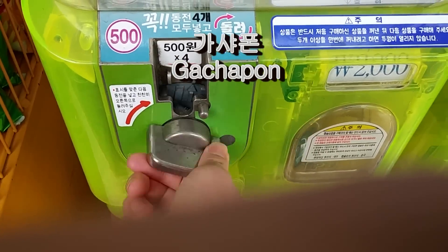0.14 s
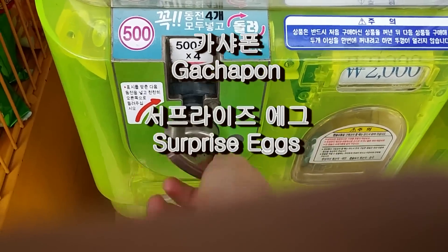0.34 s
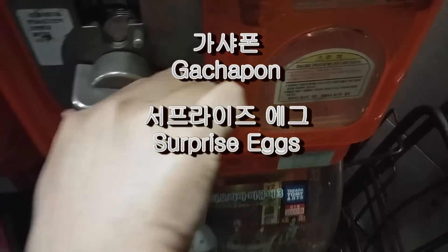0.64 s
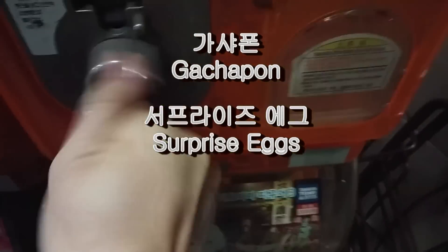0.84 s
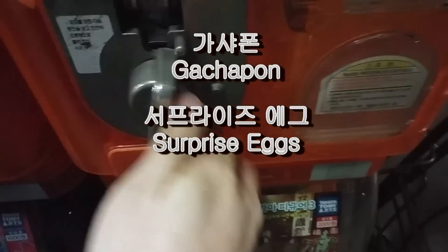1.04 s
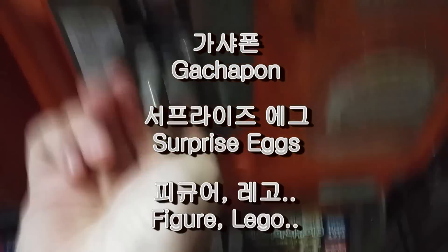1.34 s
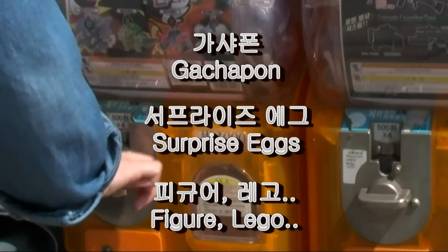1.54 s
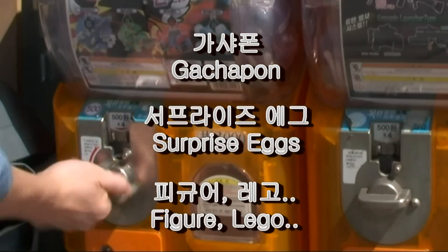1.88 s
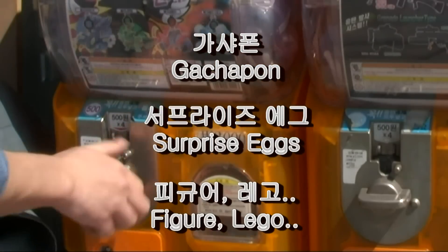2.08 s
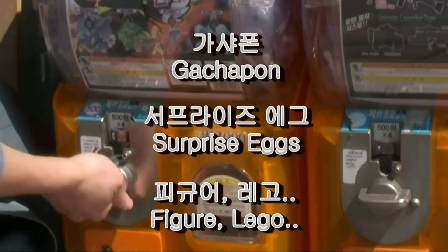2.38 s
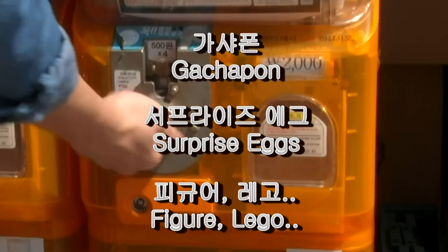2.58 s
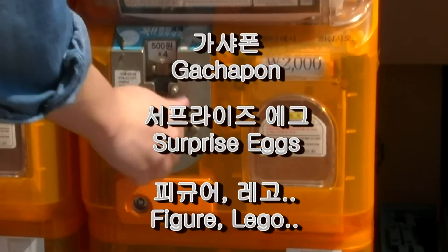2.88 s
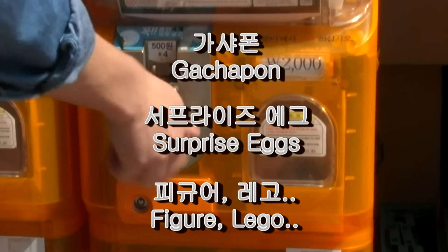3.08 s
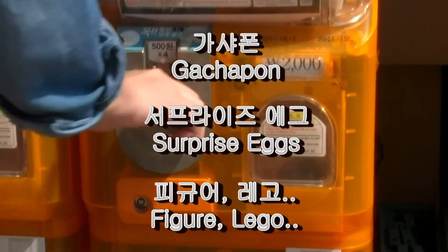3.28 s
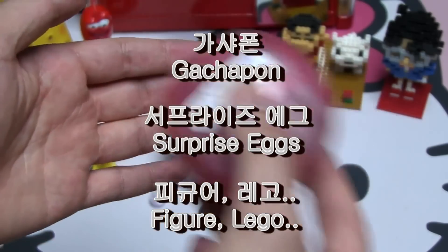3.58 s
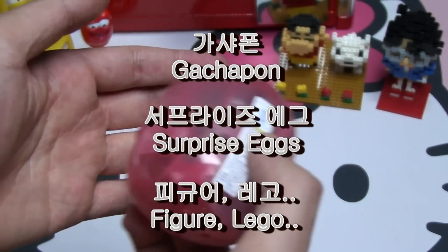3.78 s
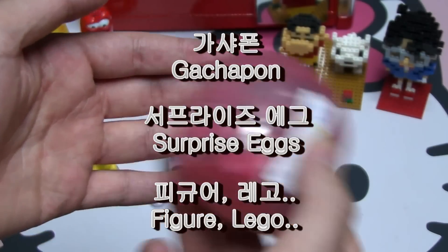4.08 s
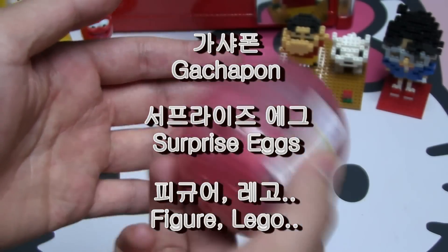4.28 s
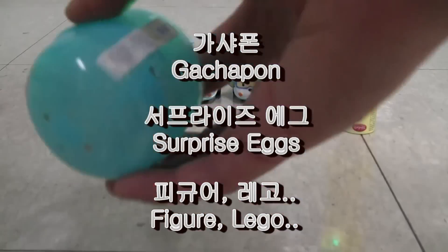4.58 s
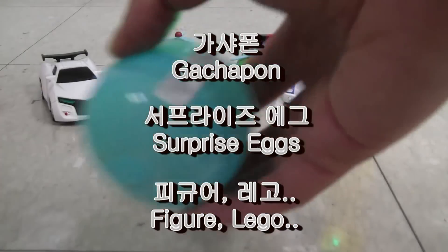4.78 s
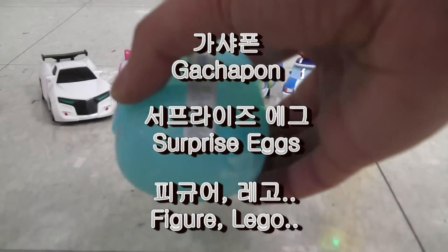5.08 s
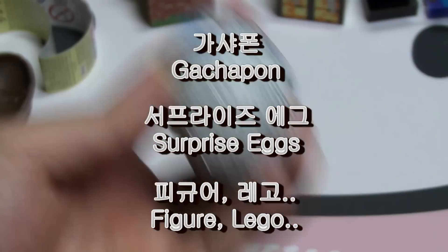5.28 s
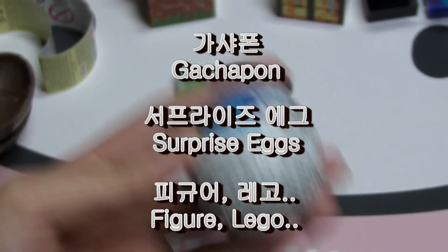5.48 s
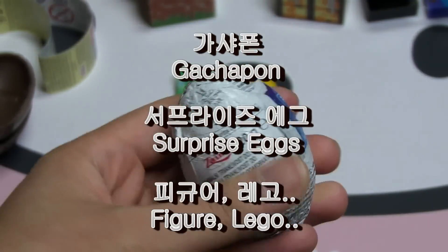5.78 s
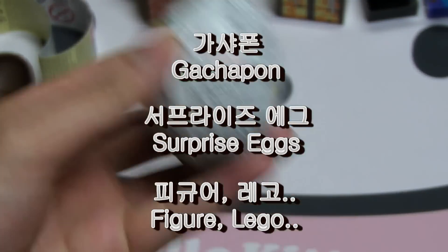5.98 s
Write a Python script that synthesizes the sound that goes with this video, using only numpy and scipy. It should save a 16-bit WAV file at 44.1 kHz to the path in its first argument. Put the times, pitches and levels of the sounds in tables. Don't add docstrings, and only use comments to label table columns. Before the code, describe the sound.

Seven abrupt cuts: a few clicks, violent gear clatter on toy machines, dense plastic shaking, sparse hollow capsule taps, and quiet foil handling.

```python
import sys
import numpy as np
from scipy import signal
from scipy.fft import irfft
from scipy.io import wavfile
from scipy.ndimage import uniform_filter1d

SR = 44100
rng = np.random.default_rng(int(sys.argv[2]) if len(sys.argv) > 2 else 0)


def output_pcm(signal):
    pcm = np.clip(np.atleast_2d(signal).T, -1, 1) * 32767
    wavfile.write(sys.argv[1], SR, np.round(pcm).astype(np.int16))


def level_to_linear(level):
    exponent = np.asarray(level, float) / 20
    return 10 ** exponent


N = 270774

# (start [s], end [s], background [dB], t60 at 1 kHz [ms], clicks in a contact [1/ms], left-right
# likeness at 500 Hz, at 2 kHz, at 10 kHz [-1..1], treble balance [dB], high-pass of the rings [Hz])
TAKES = [
    (0, .433, -32.5, 20.4, 8.1, 0.85, 0.041, 0.066, -10.5, 90),
    (0.436, 1.615, -51, 23, 6.75, 0.87, 0.069, -0.14, -9, 128),
    (1.614, 2.542, -35.5, 21.4, 5.95, 0.97, 0.95, 0.16, -2, 235),
    (2.543, 3.377, -32, 17, 6.6, 0.96, 0.98, 0.56, -1, 253),
    (3.38, 4.619, -45.5, 10.6, 4.25, 0.79, 1, 0.51, -0.5, 623),
    (4.62, 5.282, -42, 10, 4.64, 0.96, 0.88, 0.31, -1, 670),
    (5.286, 6.141, -46, 5.2, 6.6, 0.91, 0.9, 0.047, -1, 510),
]

# (time [s], peak level [dB], brightness above 5 kHz [dB], length [ms])
GREEN_HITS = [
    (.0546, -20, -12, 45),
    (.117, -9, 7, 4.1),
    (.1615, -15.5, -2.5, 22),
    (.2074, -14.5, -4, 14),
    (.2271, -24, 6.5, 6.7),
    (.2405, -18, -4.5, 14),
    (.302, -21, -13.5, 26),
    (.4202, -18, -13.5, 9.4),
]
# (time [s], peak level [dB], brightness above 5 kHz [dB], length [ms])
RED_HITS = [(.477, -28, 3.5, 2), (.672, -40, -18, 9.3), (.8134, -32, -20, 15), (.8399, -16.5, -7.5, 7.8),
            (.8573, -25, -9, 4.6), (.88, -14, -14, 11), (.8864, -8, 12.5, 11.5), (.8945, -3, 0, 3.6),
            (.9079, -1, 0.5, 10.4), (.9318, 8, 9.5, 9.4), (.9445, -3, 3, 8.7), (.9555, -2.5, 12, 22),
            (.9695, 1, 18, 6.6), (.9918, 0.5, 6, 10.5), (1.0055, 2.5, 10, 9.8), (1.0784, -13, -8, 29),
            (1.1332, -7, -12, 2.6), (1.1657, -7.5, -23.5, 4.5), (1.1822, -15, -14.5, 29.8),
            (1.318, -19.5, -16.5, 27), (1.3423, 0, 4, 6.7), (1.3517, 1, 4.5, 14), (1.3651, 0.5, 0, 13.4),
            (1.384, -10.5, -14.5, 7.5), (1.402, -14, -21, 5.2), (1.415, -16.5, -19, 6.9),
            (1.4389, -7.5, -18, 10.3), (1.4573, -7, -15, 8.9), (1.4845, -8, -17, 4.4), (1.4945, -9, -16, 4),
            (1.535, -17, -19.5, 11), (1.5711, -22.5, -23.5, 9)]
# (time [s], peak level [dB], brightness above 5 kHz [dB], length [ms])
ORANGE_HITS = [(1.7399, -2, -13, 16), (1.7565, -1, -6.5, 22), (1.79, -13, -12, 12), (1.815, -8.5, -17, 22),
               (1.845, -9.5, -9, 28), (1.8898, 4.5, -7, 13.2), (1.9183, 1.5, -6, 10),
               (1.9636, -3.5, -11, 13), (1.9808, -15.5, -4, 47), (2.011, -4.5, -14, 9.6),
               (2.0219, 2.5, -8, 11), (2.04, 5, -2, 8.2), (2.0545, 5, -13, 12.3), (2.1, 6, -3, 5.1),
               (2.1405, -11.5, -26, 15), (2.1838, -7, -25, 14.4), (2.2009, -7.5, -24.5, 13),
               (2.2224, -6, -25, 8.5), (2.3681, -11.5, -26, 33), (2.4451, -17, -21, 6.4),
               (2.4581, 0, -8, 12), (2.483, 1, 1, 5.7), (2.5211, 1.5, -10, 9.1)]
# (time [s], peak level [dB], brightness above 5 kHz [dB], length [ms])
ORANGE_LATE_HITS = [(2.5537, -14.5, -1, 3.9), (2.629, -12.5, -3.5, 4.7), (2.637, -0.5, 0.5, 18),
                    (2.6528, 1, 6, 8.1), (2.671, -7, -2, 14), (2.7011, 3.5, 4, 9.7), (2.713, 5.5, 6, 13.3),
                    (2.742, -2.5, -4.5, 10), (2.7578, -3.5, -10.5, 10), (2.772, -0.5, -2.5, 17),
                    (2.8314, -7, -18, 25), (2.8558, -10.5, -9, 54), (2.8968, -8.5, -10, 31),
                    (2.9996, -7.5, -14.5, 9.5), (3.0157, -7.5, -18.5, 19), (3.0363, 4.5, 8, 9.1),
                    (3.0568, 0.2, -6, 13), (3.0929, 1, -3.5, 9.9), (3.113, -4, -36, 14.2),
                    (3.1672, -6.5, -23.5, 9.3), (3.188, -13, -25.5, 5.8), (3.2039, -12, -26, 6.5),
                    (3.214, -11, -17, 14), (3.257, -11, -2, 7.7), (3.2645, -8, 10.5, 2.5)]
# (time [s], peak level [dB], length [ms])
PINK_HITS = [(3.4856, -3, 4), (3.492, -5, 5.8), (3.5025, -14, 3.7), (3.5275, -7.5, 4), (3.5345, -11, 4.6),
             (3.5405, -11, 2.6), (3.549, -17, 4), (3.5684, -8, 8.6), (3.5758, -8.5, 2.4), (3.5846, -8, 5),
             (3.61, -10.5, 9.8), (3.6237, -15.5, 3.9), (3.6547, -7.5, 14), (3.6921, -6.5, 13),
             (3.7089, -12, 2.5), (3.7322, -9.5, 4.1), (3.7375, -3.5, 7.2), (3.7459, -4, 4.6),
             (3.7666, -3.5, 18), (3.811, -0.5, 7.9), (3.8265, -12, 6), (3.8506, -6, 2.7),
             (3.8822, -7.5, 12), (3.894, -12, 3.4), (3.909, -23.5, 2), (3.9255, -17, 11.5),
             (3.9535, -21.5, 6.3), (4.0085, -24.5, 4.2), (4.0214, -26.5, 4), (4.0645, -26.5, 4.56),
             (4.164, -38, 5), (4.175, -33, 15), (4.229, -21, 8.4), (4.244, -16.5, 4.2),
                   (4.2827, -14.5, 3.6), (4.2902, -11, 9), (4.2986, -16, 4.6), (4.313, -25.5, 6.8),
                   (4.327, -12.5, 7.4), (4.335, -0.5, 9.4), (4.3436, -1, 4.02), (4.367, -8, 4),
                   (4.3763, -5.5, 2.4), (4.38, -10, 13), (4.4118, -7, 2.2), (4.413, -4, 20),
                   (4.432, -3, 3.04), (4.4544, -4.5, 3.8), (4.46, -3.5, 12), (4.473, -13, 7.3),
                   (4.4954, -2, 11), (4.5309, -8.5, 9.8), (4.5458, -10, 8.1), (4.57, -8, 1.96),
                   (4.572, -9, 12)]
# (time [s], peak level [dB], length [ms])
BLUE_HITS = [(4.7054, -14, 1.9), (4.712, -18.5, 10.5), (4.765, -22, 7.7), (4.7983, -19, 15),
             (4.8591, -11, 6.4), (4.8862, -20, 2.8), (4.8925, -31, 2.9), (4.899, -13.5, 7.9),
             (4.908, -18, 5.3), (4.92, -17, 3.5), (4.928, -24, 2.1), (4.9518, -15, 7.1),
             (4.9598, -13.5, 2.6), (4.982, -13.5, 1.7), (5.0021, -15.5, 4.3), (5.0371, -17, 8.6),
             (5.0805, -20.5, 1.8), (5.087, -12.5, 18), (5.128, -16, 8.3)]
# (time [s], peak level [dB], length [ms])
EGG_HITS = [(5.3871, -23.5, 27.6), (5.4191, -26, 27), (5.4694, -21, 29), (5.5099, -21, 3),
            (5.545, -22.5, 29), (5.5918, -25.5, 8.2), (5.6316, -9.5, 2.87), (5.6806, -17, 3.2),
            (5.687, -26.5, 11), (5.7296, -26.5, 34), (5.7627, -19.5, 4.6), (5.8876, -31, 3.7),
            (6.0132, -28, 3), (6.0754, -14, 1), (6.1043, -26, 24)]

# (time [s], level [dB])
GREEN_EFFORT = [(.01, -53), (.1, -48), (.27, -48.5), (.42, -61)]
# (time [s], level [dB])
RED_EFFORT = [(.45, -85), (.8, -90.5), (.87, -97), (0.887, -25), (.98, -19.5), (1.03, -25.5), (1.12, -39.5),
              (1.22, -54.5), (1.337, -51),
              (1.342, -24.5), (1.39, -27), (1.47, -39), (1.55, -43.5), (1.6, -52.5)]
# (time [s], level [dB])
ORANGE_EFFORT = [(1.625, -61), (1.734, -48), (1.741, -13), (1.87, -26.5), (2.22, -26), (2.25, -42),
                 (2.37, -47.5), (2.44, -27), (2.53, -14)]
# (time [s], level [dB])
ORANGE_LATE_EFFORT = [(2.545, -32), (2.556, -22), (2.628, -34.5), (2.638, -15.5), (2.93, -28.5),
                      (2.98, -31.5), (3.08, -21), (3.14, -39.5), (3.37, -51.5)]
# (time [s], level [dB])
PINK_EFFORT = [(3.39, -55), (3.475, -59.5), (3.49, -29.5), (3.921, -31), (3.98, -76), (4.2, -55),
               (4.33, -28.5), (4.56, -27.5), (4.61, -44)]
# (time [s], level [dB])
BLUE_EFFORT = [(4.63, -60), (4.70, -42), (4.84, -43.5), (4.9, -35.5), (4.94, -49.5), (5.1, -43.5),
               (5.15, -39.5), (5.18, -72), (5.275, -81)]
# (time [s], level [dB])
EGG_EFFORT = [(5.295, -49), (5.37, -45), (5.4, -46), (5.7, -43), (5.8, -46), (6.05, -57), (6.13, -44)]
# (level near -40 dB effort [dB], share of effort swing [dB/dB])
RUMBLE = [(-31.5, 0.32), (-31, 0.68), (-28.5, 0.41), (-27, 0.2), (-41.5, 0.96), (-42.5, 0.43), (-45, 0.68)]

# (frequency [Hz], density [dB/Hz])
GREEN_BODY = [(59, -20), (100, 8), (682, -6), (977, -7), (4280, -20), (9340, -20), (15500, -26)]
# (frequency [Hz], density [dB/Hz])
RED_BODY = [(59, -46), (100, 6.5), (333, 2.5), (386, -1.5), (918, 0.5), (2530, -6), (3780, -13),
            (4200, -11), (7920, -17), (9570, -12), (15600, -24)]
# (frequency [Hz], density [dB/Hz])
ORANGE_BODY = [(59, -41), (100, -23), (243, -4), (498, 1), (1230, 0), (4480, -8), (6690, -10.5),
               (15600, -22.5)]
# (frequency [Hz], density [dB/Hz])
PINK_BODY = [(240, -57), (400, -16.5), (1640, -9), (2120, 0.5), (2630, -9), (3260, 0.5), (5930, -16.5),
             (8300, -20.5), (15600, -39)]
# (frequency [Hz], density [dB/Hz])
BLUE_BODY = [(240, -53), (400, -23), (600, -4), (950, 0), (1970, -25), (2710, -17.5), (3420, -24.5),
             (6020, -30.5), (7120, -27.5), (15600, -43)]
# (frequency [Hz], density [dB/Hz])
EGG_BODY = [(180, -55.5), (300, 2), (893, 5), (3190, -13), (3700, -19), (6380, -27), (15600, -36.5)]
# (frequency [Hz], level over body [dB], t60 [s])
COINS = [(9300, 4, 0.019)]
# (frequency [Hz], level over body [dB], t60 [s])
PLATE = [(13300, 7, .015), (13870, 10, 0.015), (14300, 5, .015)]
# (frequency [Hz], level over body [dB], t60 [s])
PINK_SHELL = [(2170, 3.5, 0.015)]
# (frequency [Hz], level over body [dB], t60 [s])
BLUE_SHELL = [(830, 14.5, 0.007), (2650, 0, 0.015)]

# (frequency [Hz], density [dB/Hz])
STREET = [(15, -45), (25, -15), (257, -4), (2600, -12.5), (9660, -34.5), (12600, -50), (14000, -86)]
# (frequency [Hz], density [dB/Hz])
YARD = [(15, -45), (25, -9), (267, -2), (723, -14), (897, -14.5), (9580, -35.5), (15600, -51.5)]
# (frequency [Hz], density [dB/Hz])
PAVEMENT = [(15, -53), (25, -6), (599, 3), (897, -11), (1620, -26.5), (2630, -17), (15600, -40.5)]
# (frequency [Hz], density [dB/Hz])
DESK = [(15, -52), (25, -17), (538, -8), (667, -6), (1270, -6.5), (2780, -24.5), (15600, -27.5)]
# (frequency [Hz], density [dB/Hz])
HALL = [(15, -35), (25, -12.5), (75, -3.5), (119, -5.5), (314, -3.5), (440, -4.5), (600, -15), (15600, -33)]

# (time [s], pitch [Hz], peak level [dB], t60 [ms])
GEAR_PINGS = [(.0600, 2050, -22, 20), (.117, 5830, -14, 4.9), (.165, 2390, -26, 20), (.285, 5150, -39, 60),
              (.934, 4240, -14, 15), (1.006, 10140, -1, 20.5), (1.134, 860, 0, 13), (1.195, 864, -24, 37),
              (1.225, 246, -22, 71), (1.352, 9170, -4.5, 24), (1.401, 458, -9, 22), (1.4575, 946, -4, 20),
              (1.742, 670, -4.5, 35), (1.762, 2620, -6.5, 16), (1.848, 465, -9.5, 46),
              (1.891, 728, -1.5, 25), (1.893, 1280, 0.5, 20), (1.984, 980, -33, 20), (2.057, 2680, -5, 20),
              (2.059, 3120, -14.5, 17), (2.1, 1330, 2, 12), (2.101, 2500, -8, 15), (2.184, 1390, -7, 15),
              (2.205, 1370, -10.5, 27), (2.209, 390, -6.5, 34), (2.459, 486, -10.5, 23),
              (2.486, 4060, -10.5, 12), (2.522, 1390, -2.5, 20), (2.554, 4000, -16, 11),
              (2.657, 7050, -0.5, 18), (2.675, 6655, -8, 15), (2.712, 3270, -12, 48),
              (2.733, 817, -7.5, 42), (2.765, 900, -15, 32), (2.905, 1245, -10.5, 26),
              (3.037, 2270, -1.5, 11), (3.045, 1190, -6, 20), (3.058, 5730, -13, 20), (3.096, 5290, 1, 23),
              (3.098, 2630, -8.5, 28), (3.167, 2640, -8.5, 18), (3.169, 1430, -7.5, 28),
              (3.172, 3600, -15, 23), (3.189, 2509, -17, 15), (3.189, 4370, -25, 15),
              (3.214, 4300, -27, 15), (3.264, 5380, -11.5, 11)]
# (time [s], pitch [Hz],
# peak level [dB], t60 [ms])
SHELL_PINGS = [(4.176, 2160, -30.5, 48), (4.257, 2270, -26, 25), (4.337, 2220, -13, 22),
               (4.7053, 920, 9, 10.2), (4.7058, 1310, -2.5, 8), (4.716, 2670, -26, 20),
               (4.9598, 2600, -8, 7.8), (4.9822, 910, 12, 10.4), (4.9816, 1310, 1, 7.3),
               (5.0806, 910, 3, 10.8), (4.722, 1140, -18, 27), (4.8013, 950, -22, 25),
               (4.8865, 830, -14, 12), (4.9085, 920, -17, 30), (6.1045, 1150, -17, 6),
               (5.003, 2600, -23, 15), (5.082, 2780, -21, 13), (5.132, 3300, -24.5, 8.9),
               (5.509, 1300, -22, 8), (5.632, 990, -11, 8), (5.632, 2780, -19, 5.5), (5.632, 4920, -24, 5),
               (5.681, 3730, -23, 8.6), (5.763, 1000, -13.5, 10),
               (3.4865, 3330, -25, 6.7), (3.4931, 3300, -13, 8), (3.5355, 2000, -16, 8),
             (3.5415, 2050, -9, 8), (3.5765, 2300, -10, 6.4), (3.625, 2090, -6.5, 7.7),
             (3.656, 1880, -9.5, 10), (3.7005, 5000, -8, 6), (3.7095, 2080, -5, 9), (4.4165, 3300, -6, 8),
             (4.5005, 3370, -6, 8), (4.571, 3470, -11, 8)]
# (time [s], peak level [dB])
JOLTS = [
    (0.93, -7),
    (1, -10.5),
    (1.347, -20.5),
    (2.481, -19.5),
    (2.697, -18),
    (3.483, -31),
]
# (time [s], peak level [dB], t60 [ms])
SNAPS = [
    (4.7055, -11, 6.7),
    (4.9816, -8, 7.5),
    (5.0457, -12.5, 7),
    (5.0797, -17.5, 4.6),
    (5.634, -22, 5),
]

PINK_TILT, BLUE_TILT, EGG_TILT = 0.85, 0.45, -0.31
RISE_SHARE = 0.3
SPOT_COLOUR_DB = 1.9
EVENNESS = 0.72
PING_RISE_CYCLES, PING_SPLIT = 0.7, 0.014
PING_ECHO_SHARE = 0.47


def at_hz(points, hz):
    points_hz, values = np.transpose(points)
    return np.interp(np.log(hz), np.log(points_hz), values)


def rms_one(x):
    return x / np.sqrt(np.mean(x ** 2) + 1e-20)


def place_at(out, s, sound):
    start = round(s * SR)
    out[:, start:start + sound.shape[1]] += sound


def strengths(hz, alike, balance_db):
    likeness = np.clip(at_hz(list(zip((500, 2000, 10000), alike)), hz), -.99, .99)
    draw = rng.standard_normal((2, len(hz)))
    mid, side = np.sign(draw) * np.abs(draw) ** EVENNESS
    lean_db = at_hz([(6000, 0.0093), (9500, balance_db / 2), (12000, 0.0046)], hz)
    lean = level_to_linear(lean_db * [[1], [-1]])
    return lean * (np.sqrt(1 + likeness) * mid + np.sqrt(1 - likeness) * side * [[1], [-1]])


def background(spectrum, size, level_db, ears):
    hz = np.maximum(np.fft.rfftfreq(size, 1 / SR), 5)
    both = strengths(hz, *ears) + 1j * strengths(hz, *ears)
    return level_to_linear(level_db) * rms_one(irfft(both * level_to_linear(at_hz(spectrum, hz)), size))


def modes(body, parts, t60_ms, ring_low_hz):
    root = np.linspace(9, 125.5, 300)
    dense = (root + rng.uniform(-.2, .2, len(root))) ** 2
    dense_t60 = t60_ms / 1000 * (1000 / dense) ** .4
    hz = np.r_[dense, [p[0] for p in parts]]
    t60 = np.r_[dense_t60, [p[2] for p in parts]]
    level_db = at_hz(body, hz) + np.r_[0 * dense, [p[1] for p in parts]]
    height = level_to_linear(level_db) * np.sqrt(np.sqrt(hz) / t60)
    t = np.arange(3072) / SR
    rings = height[:, None] * level_to_linear(-60 * t / t60[:, None]) * np.sin(2 * np.pi * hz[:, None] * t)
    rings = rings * (1 - np.exp(-1.3 * hz[:, None] * t)) ** 2
    small = signal.butter(3, ring_low_hz, "high", fs=SR, output="sos")
    return hz, signal.sosfilt(small, rings)


def clicks(size, per_s, spread_db):
    draw = rng.random((3, size))
    happens = draw[0] < per_s / SR
    sign = np.sign(draw[1] - .5)
    return happens * sign * level_to_linear(-spread_db * np.log(draw[2] + 0.0057))


def rattle(curve, rumble, span, hz, rings, per_s, ears):
    t, out = np.arange(*span) / SR, 0
    clumps = uniform_filter1d(rng.standard_normal(len(t)), size=500)
    clump_gain = level_to_linear(3.9 * rms_one(clumps))
    spots = [clicks(len(t), per_s / 6, 2.16) * clump_gain for _ in range(6)]
    split = at_hz([(800, 0.97), (3800, 1.0)], hz)
    effort_db = np.interp(t, *np.transpose(curve))
    rumble_db = rumble[0] + rumble[1] * (effort_db + 36.5)
    for group, level_db in ((1 - split, rumble_db), (split ** 2, effort_db)):
        rung = 0
        for spot in spots:
            ring = (strengths(hz, *ears) * group) @ rings
            rung = rung + signal.oaconvolve(ring, spot[None], axes=1)
        out = out + level_to_linear(level_db) * rms_one(rung[:, :len(t)])
    return out


def contacts(hits, hz, rings, per_ms, ears):
    out = np.zeros((2, N + 9000))
    usual_db = np.mean(hits, axis=0)[2]
    t_ms = np.arange(4096) / SR * 1000
    for s, peak_db, bright_db, length_ms in hits:
        rise_ms = max(RISE_SHARE * length_ms - .5, .03)
        fall_ms = max((1 - RISE_SHARE) * length_ms, .3)
        swell = 0.59 + 0.087 * t_ms / rise_ms
        shape = np.where(t_ms < rise_ms, swell, level_to_linear(-10 * (t_ms - rise_ms) / fall_ms))
        bursts = [shape * clicks(len(t_ms), per_ms * 1000 / 3, 3.5) for _ in range(3)]
        bursts[0][int(rise_ms * SR / 1000)] = 2.76
        bursts[1][0] = 2.75
        tilt = level_to_linear(at_hz([(1000, 0.0043), (5500, bright_db - usual_db)], hz))
        colour = uniform_filter1d(rng.standard_normal(len(hz)), size=9)
        tilt = tilt * level_to_linear(SPOT_COLOUR_DB * rms_one(colour))
        hit = 0
        for burst in bursts:
            ring = (strengths(hz, *ears) * tilt) @ rings
            hit = hit + signal.fftconvolve(ring, burst[None, shape > 1e-3], axes=1)
        place_at(out, s, level_to_linear(peak_db - 1.0) * hit / np.abs(hit.mean(axis=0)).max())
    return out[:, :N]


def pings():
    out, t = np.zeros((2, N + 4000)), np.arange(4000) / SR
    for s, hz, peak_db, t60_ms in GEAR_PINGS + SHELL_PINGS:
        lower = np.sin(2 * np.pi * hz * (1 - PING_SPLIT) * t)
        upper = np.sin(2 * np.pi * hz * (1 + PING_SPLIT) * t)
        rise = (1 - np.exp(-hz * t / PING_RISE_CYCLES)) ** 2
        ping = level_to_linear(peak_db - 60000 * t / t60_ms) * rise * (lower + .5 * upper)
        place_at(out, s, np.tile(ping, (2, 1)))
    return out[:, :N]


def echoes(x, level_db, t60):
    t = np.arange(12000) / SR
    mid, side = rng.standard_normal((2, len(t))) * level_to_linear(-60 * t / t60) * (t > .004)
    tail = signal.lfilter([1], [1, -.55], mid + 0.17 * side * [[1], [-1]])
    tail = tail / np.sqrt(np.sum(tail ** 2, axis=1, keepdims=True))
    return level_to_linear(level_db) * signal.oaconvolve(x, tail, axes=1)[:, :x.shape[1]]


def jolts():
    out, t = np.zeros((2, N)), np.arange(5000) / SR
    low = signal.butter(2, [30, 170], "band", fs=SR, output="sos")
    for s, peak_db in JOLTS:
        mid, side = rng.standard_normal((2, len(t))) * np.exp(-t / 0.0045)
        thud = signal.sosfilt(low, mid + 0.24 * side * [[1], [-1]]) * level_to_linear([[2.2], [-2.2]])
        place_at(out, s, level_to_linear(peak_db) * thud / np.abs(thud).max())
    return out


def brightened(hits, tilt):
    return [(s, peak_db, tilt * peak_db, length_ms) for s, peak_db, length_ms in hits]


def snaps():
    out, t = np.zeros((2, N + 800)), np.arange(800) / SR
    band = signal.butter(2, (1200, 4500), "band", fs=SR, output="sos")
    for s, peak_db, t60_ms in SNAPS:
        mid, side = rng.standard_normal((2, len(t))) * level_to_linear(-60000 * t / t60_ms)
        snap = signal.sosfilt(band, mid + 0.4 * side * [[1], [-1]])
        place_at(out, s, level_to_linear(peak_db) * snap / np.abs(snap).max())
    return out[:, :N]


def scene():
    pink_hits = brightened(PINK_HITS, PINK_TILT)
    blue_hits = brightened(BLUE_HITS, BLUE_TILT)
    egg_hits = brightened(EGG_HITS, EGG_TILT)
    objects = [(GREEN_HITS, GREEN_BODY, COINS, STREET, GREEN_EFFORT),
               (RED_HITS, RED_BODY, COINS, YARD, RED_EFFORT),
               (ORANGE_HITS, ORANGE_BODY, PLATE, PAVEMENT, ORANGE_EFFORT),
               (ORANGE_LATE_HITS, ORANGE_BODY, PLATE, PAVEMENT, ORANGE_LATE_EFFORT),
               (pink_hits, PINK_BODY, PINK_SHELL, DESK, PINK_EFFORT),
               (blue_hits, BLUE_BODY, BLUE_SHELL, HALL, BLUE_EFFORT),
               (egg_hits, EGG_BODY, [], DESK, EGG_EFFORT)]
    out, thuds, all_pings = np.zeros((2, N)), jolts(), pings()
    for (hits, body, parts, place, effort), rumble, take in zip(objects, RUMBLE, TAKES):
        start, end, place_db, t60_ms, per_ms, *alike, balance_db, ring_low_hz = take
        a, b = round(start * SR), min(round(end * SR), N)
        ears = (alike, balance_db)
        hz, rings = modes(body, parts, t60_ms, ring_low_hz)
        near = contacts(hits, hz, rings, per_ms, ears)[:, a:b]
        near = near + rattle(effort, rumble, (a, b), hz, rings, 650 * per_ms, ears)
        rung = all_pings[:, a:b]
        whole = near + rung + thuds[:, a:b]
        whole = whole + echoes(near + PING_ECHO_SHARE * rung, level_db=-16.0, t60=0.24)
        whole = whole + background(place, b - a, place_db, ears)
        edge = np.arange(b - a) / 60
        fade = np.minimum(edge + 60 * (a == 0), edge[::-1] + 60 * (b == N))
        out[:, a:b] = whole * np.clip(fade, 0, 1)
    return out + snaps()


def gated_top(x, until_s, top_hz, open_db):
    high = signal.butter(12, top_hz, "high", fs=SR, output="sos")
    top = signal.sosfiltfilt(high, x)
    loud = uniform_filter1d(np.mean(top ** 2, axis=0), size=600) > level_to_linear(2 * open_db)
    later = np.arange(N) > until_s * SR
    kept = uniform_filter1d((loud | later) * 1.0, size=100)
    return x - top * (1 - kept)


def low_pass(x):
    return signal.sosfilt(signal.butter(12, 15710, fs=SR, output="sos"), x)


def record(dry):
    overloaded = np.clip(dry, -1, 1)
    mix = gated_top(overloaded, until_s=.433, top_hz=12100, open_db=-40.5)
    return low_pass(mix)


dry = scene()
out = record(dry)
output_pcm(out)
```